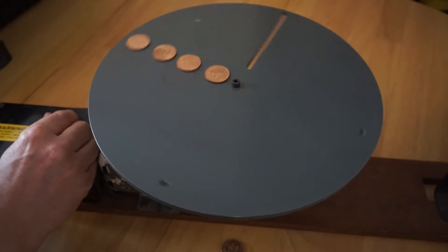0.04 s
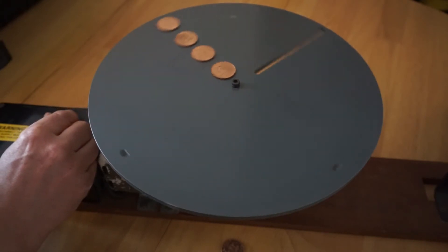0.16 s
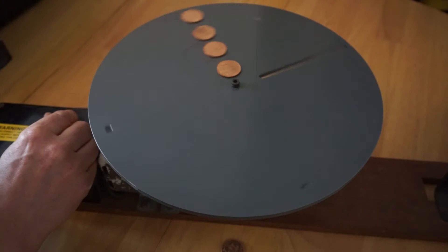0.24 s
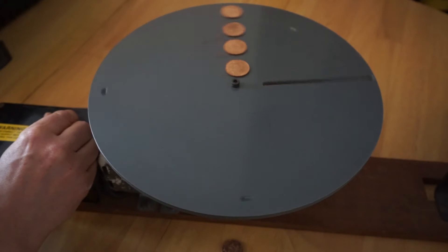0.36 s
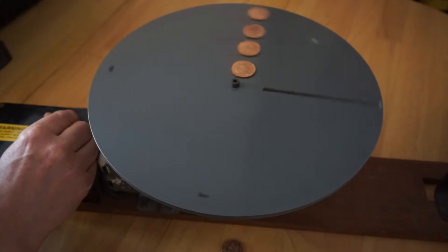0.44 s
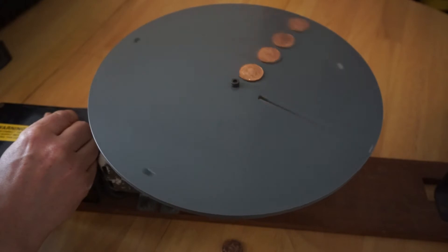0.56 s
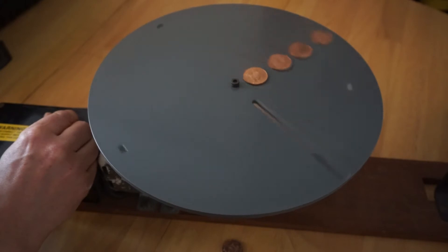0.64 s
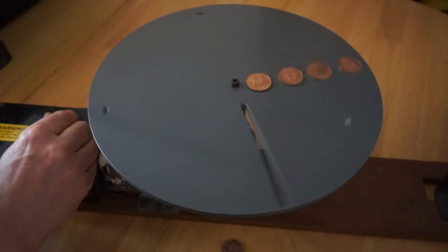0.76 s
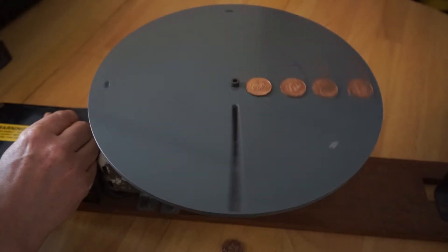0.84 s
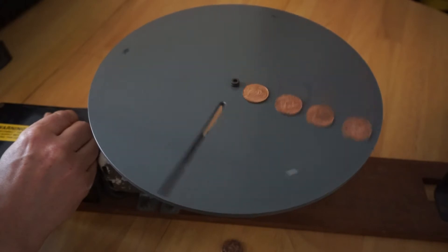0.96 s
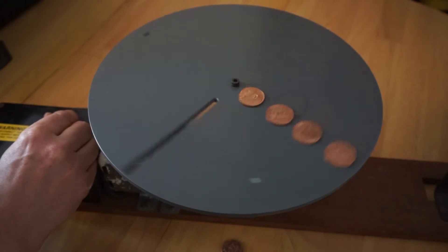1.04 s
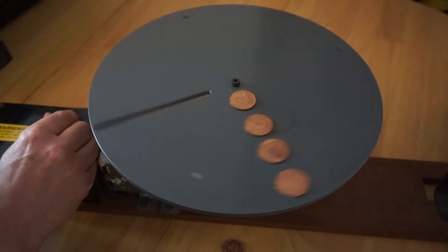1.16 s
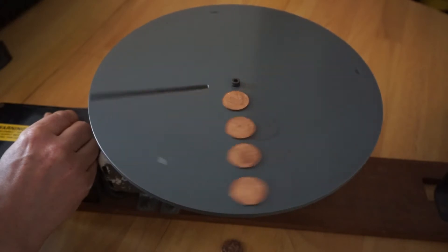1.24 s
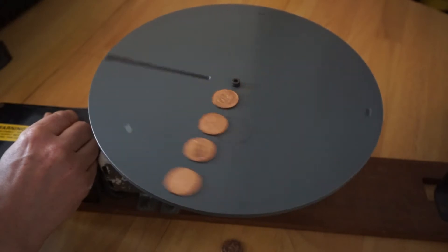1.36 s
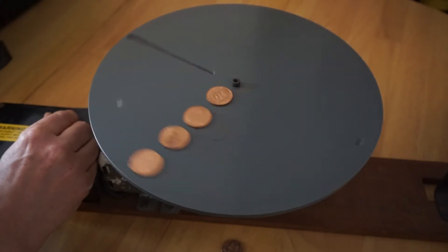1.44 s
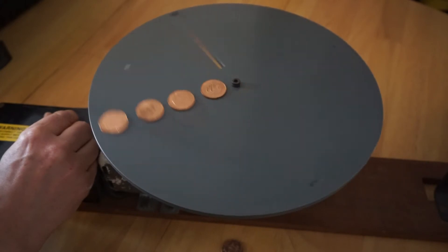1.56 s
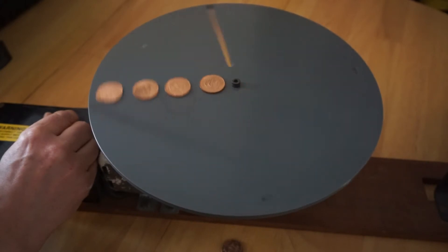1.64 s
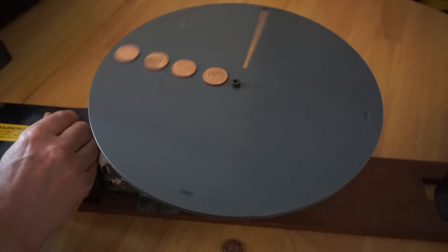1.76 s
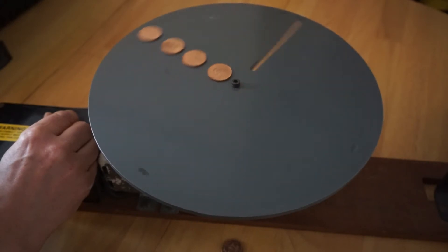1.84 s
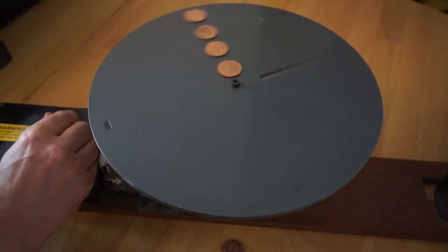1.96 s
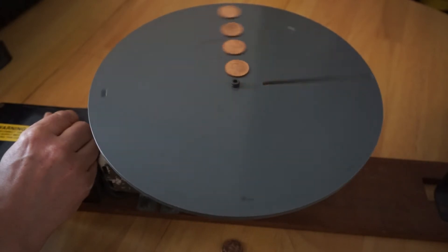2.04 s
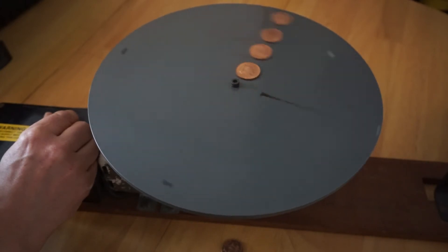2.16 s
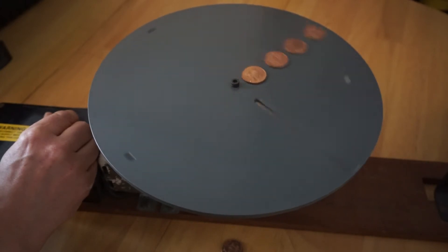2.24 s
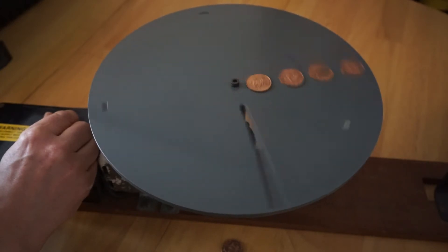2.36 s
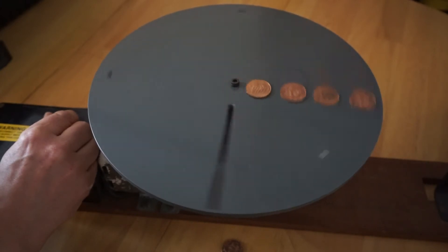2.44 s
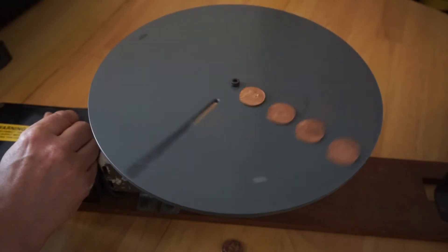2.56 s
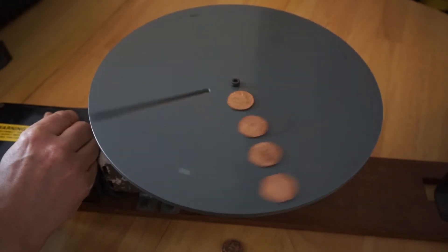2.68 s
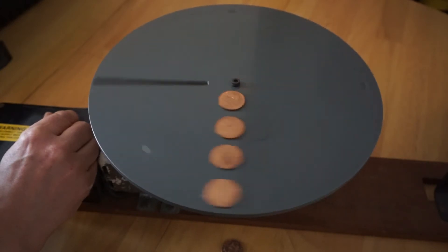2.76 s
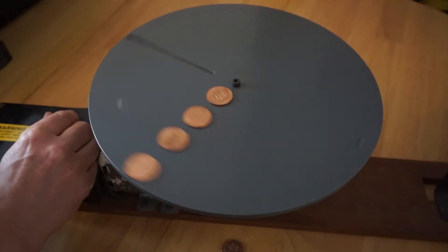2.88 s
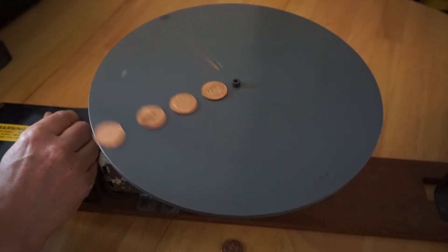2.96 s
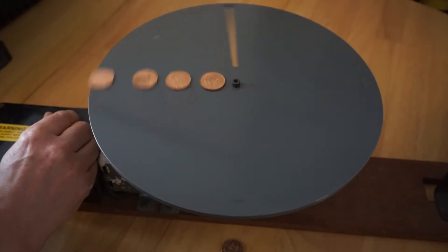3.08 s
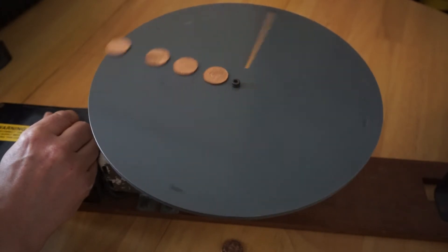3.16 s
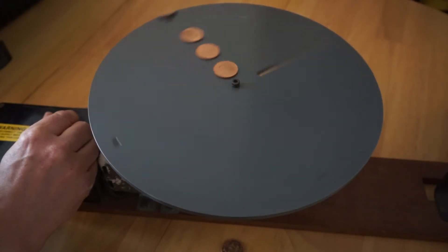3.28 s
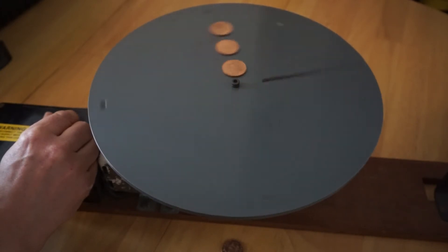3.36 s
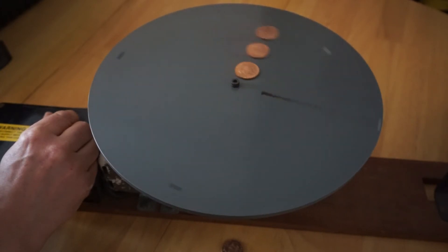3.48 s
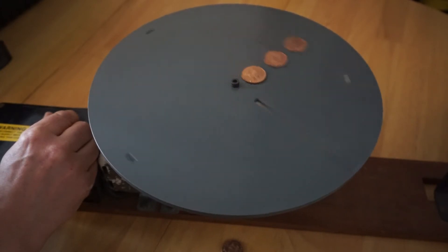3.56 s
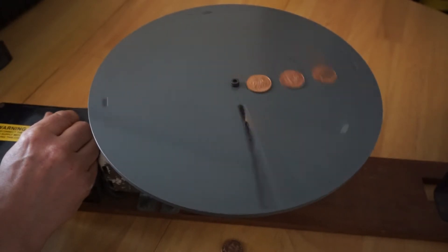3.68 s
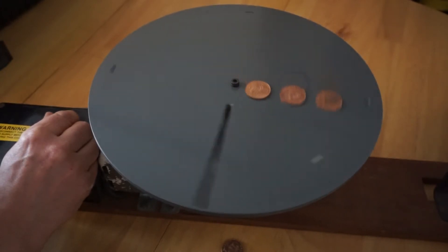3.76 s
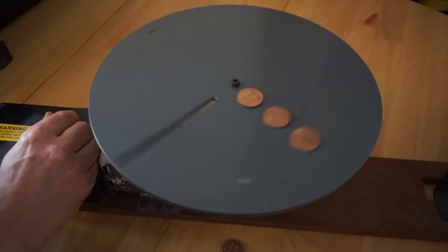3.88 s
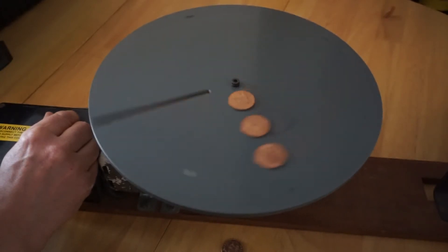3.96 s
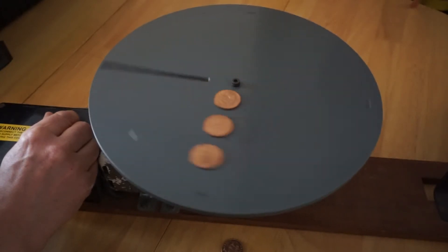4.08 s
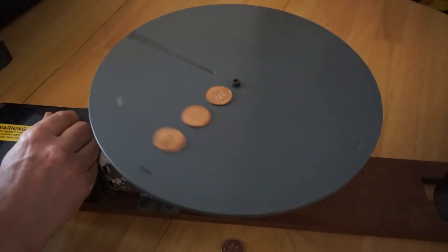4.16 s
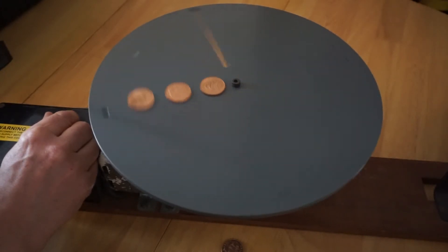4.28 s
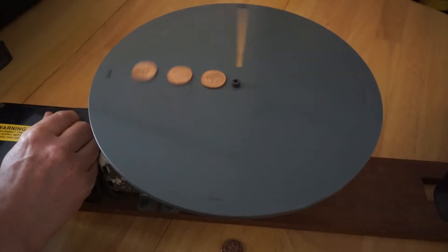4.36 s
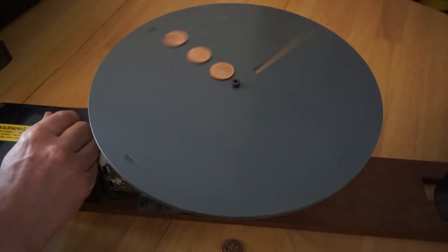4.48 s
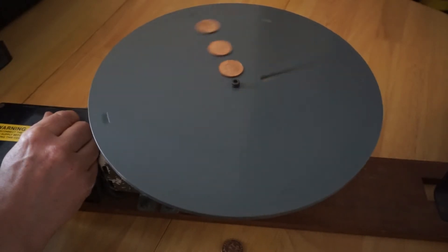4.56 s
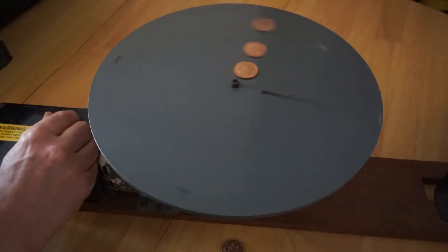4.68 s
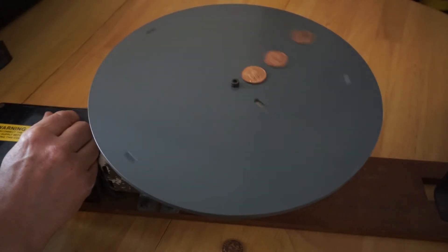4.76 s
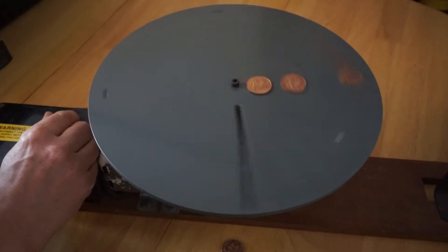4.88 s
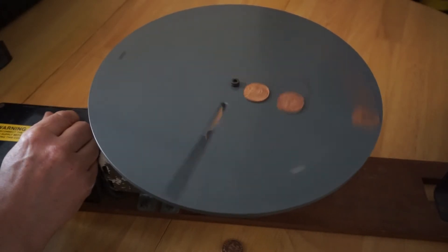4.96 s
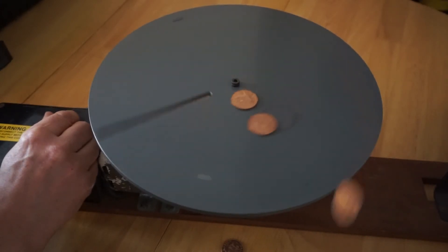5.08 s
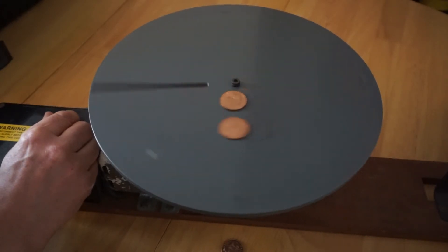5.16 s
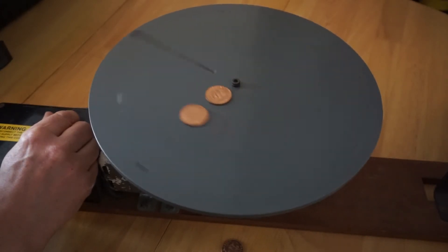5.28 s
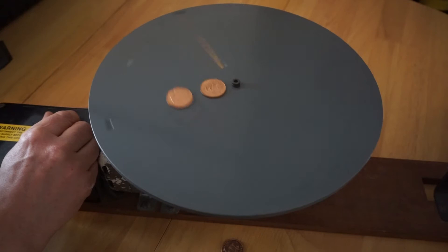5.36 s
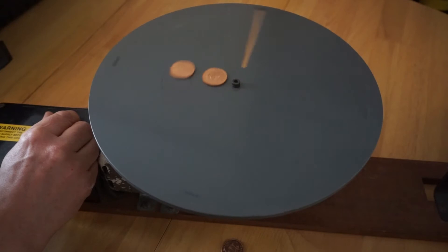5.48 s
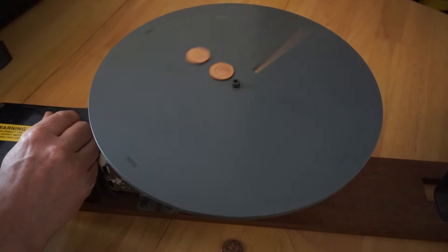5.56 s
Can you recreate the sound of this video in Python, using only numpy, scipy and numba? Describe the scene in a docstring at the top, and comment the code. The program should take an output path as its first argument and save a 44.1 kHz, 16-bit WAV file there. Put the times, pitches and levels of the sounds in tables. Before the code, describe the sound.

Close by in a small room, a motor spins a disc with a steady low hum and a rattling buzz. After a few seconds a coin slips off, clattering and ringing on a wooden tabletop before it rolls over the edge and thuds on the floor. A second coin follows with a faint scrape, bright knocks on the wood and a quick metallic clink, while the motor keeps running.

```python
"""A mains motor hums and buzzes under a spinning disc on a wooden table: its magnetic pull shakes the
frame and rattles the casing, while the disc whispers up to speed. Two coins scrape off in turn and bounce
on the wood, ringing as they tumble. The first rolls over the edge and thuds on the floor; the second
clinks against metal. Soft room air lies underneath, and a limiter ducks the mix after the hard blows."""
import sys
import numpy as np
from scipy import signal
from scipy.fft import rfft, irfft
from scipy.io import wavfile
from scipy.ndimage import uniform_filter1d
from numba import njit

SR = 44100
rng = np.random.default_rng(int(sys.argv[2]) if len(sys.argv) > 2 else 0)


def wav_record(signal):
    """Record a signal, one row per channel, as 16-bit PCM in the file named by sys.argv[1]."""
    frames = np.transpose(np.atleast_2d(signal))
    bounded = np.clip(frames, -1, 1)
    # unit amplitude maps onto the largest positive 16-bit level
    quanta = np.round(bounded * 32767).astype(np.int16)
    wavfile.write(sys.argv[1], SR, quanta)


N = 247842
T = np.arange(N) / SR
HZ = np.maximum(np.fft.rfftfreq(N, 1 / SR), 1)
AGE = T[:SR * 3 // 4]  # seconds since a hit

# The hum's harmonics. Each row: multiple of the magnetic pull, relative level in dB.
HUM_HARMONICS = [(1, -18.5), (2, -9), (3, 4), (4, 4.5), (5, -11.5), (6, -1.5), (7, -58), (8, -68),
                 (9, -18.5), (10, -26), (12, -23)]
# Resonances of the motor's casing and chassis. Each row: centre in Hz, width in Hz, gain in dB.
CASING_MODES = [(1200, 45, -17.5), (1610, 200, -19), (1795, 56, -14.5), (2043, 71, 1), (2242, 90, 6),
                (2460, 122, -1.5), (2590, 37, -16), (2820, 37, -19), (3098, 23, -6), (3544, 160, -10.5),
                (3870, 130, -27), (4855, 94, -15.5), (5810, 650, -16)]
CHASSIS_MODES = [(128.3, 7.3, -2.5), (578, 123, -4), (704, 53, 5), (806, 24, -7)]
# Coins knocking on the table. Each row: start in seconds, level in dB, treble roll-off in Hz.
COIN_KNOCKS = [(3.47, -3.5, 3620), (3.482, -5, 5600), (3.622, -7.5, 3720), (3.639, -8, 4640),
               (3.692, -9.5, 4430), (3.740, -8, 3180), (3.798, -19.5, 3270), (3.848, -25, 2600),
               (5.257, -5, 4240), (5.267, -9.5, 4440), (5.287, -11, 4300), (5.389, -17.5, 6500)]
# The table top's resonances. Each row: centre in Hz, width in Hz, gain in dB.
TABLE_MODES = [(456, 39, -5), (581.5, 39, -3.5), (764, 13, -10), (1092, 12.6, -4.5), (1300, 54, -5),
               (1462, 14, -8.5), (1690, 16, -8), (2356, 67, 0.5), (2850, 23, -28), (4210, 50, -5)]
# The tone of a knock on wood. Each row: frequency in Hz, gain in dB.
WOOD_EQ = [(60, -62), (200, -9), (400, -7), (600, -3.5), (900, -5.5), (1500, -4.5), (2800, -3),
           (4500, -7.5), (7000, -6.5), (15000, 5)]
# Coins tumbling. Each row: start and end in seconds, level in dB, attack in seconds, tumble rate in Hz.
COIN_TUMBLES = [(3.47, 3.82, -17, 0.0027, 7.72), (4.59, 4.68, -54, .003, 11),
                (5.254, 5.547, -9.5, 0.021, 18)]
# Each coin's bending modes, with close pairs that beat. Each row: pitch in Hz, level in dB.
FIRST_COIN_MODES = [(7041, -13.5), (7072, -6.5), (8479, -16), (12090, -27), (12352, -8.5), (12396, 2)]
SECOND_COIN_MODES = [(7002, -22), (7058, -18), (8465, -23), (12307, -11), (12345, -6), (12408, -9)]
# The second coin hitting metal. Each row: start in seconds, level in dB.
METAL_HITS = [(5.391, -11.5), (5.414, -9.5), (5.421, -2.5)]
# The metal's ring. Each row: pitch in Hz, level in dB, seconds to decay by 60 dB.
METAL_MODES = [(3813, -3, .2), (4890, -7, .17), (9075, -13, .16), (10830, -14, .16), (11618, -10, .17),
               (13660, -13, .12), (14490, -20, .12)]
# The second coin's dry ticks. Each row: start in seconds, level in dB, centre in Hz, width in Hz.
DRY_TICKS = [(5.390, -8, 3480, 2600), (5.392, -12, 1630, 500), (5.555, -20.5, 7000, 1200)]
# Dull hits on table edge and floor. Each row: start in seconds, level in dB, low and high cut in Hz.
DULL_HITS = [(4.133, -22, 617, 2600), (4.5378, -11, 135, 1440), (4.5445, -13, 125, 685),
             (4.5943, -12, 495, 2620), (4.601, -15.5, 256, 526), (4.761, -30, 93, 265.6),
             (4.908, -35, 88, 242)]
# The floorboards' boom. Each row: pitch in Hz, level in dB, seconds to decay by 60 dB.
FLOOR_MODES = [(143, -4, .22), (177, -5, .18), (232, -13, .17), (362, -6, .2), (720, -14, .12)]
# Coins sliding off the disc. Each row: arrival at the rim in seconds, level there in dB.
COIN_SLIDES = [(3.28, -43), (5.09, -37.5)]
# The room tone's colour. Each row: frequency in Hz, gain in dB.
AIR_EQ = [(15, -15), (26, -10.5), (38, -5.5), (70, -19.5), (250, -11), (500, -11.5), (1150, -19.5),
          (3000, -13), (8000, -32), (15000, -39.5)]

ROOM_T60_S, WIDE_HZ = 0.39, 2600  # the stereo image opens up around WIDE_HZ


def motor(pull_hz=99.82, hum_db=-32.5, casing_db=-37):
    """The magnetic pull hums in the frame and taps the casing once a cycle; both swell with each turn."""
    cycles = pull_hz * T + 0.003 * wander(5)
    left_lead = np.array([[1], [0]])  # the motor sits left, so that side is a touch early
    hum = unit_rms(sum(undb(db) * np.cos(2 * np.pi * round(k) * (cycles + 0.0098 * left_lead))
                       for k, db in HUM_HARMONICS))
    # nearly even taps ring the casing, and a rasp swells with each
    chatter = cycles + .35 + 0.0011 * wander(60)
    tap_size = undb(.4 * wander(100))
    taps = np.diff(np.floor(chatter + 0.0051 * left_lead), prepend=0) * tap_size
    shell = resonances(CASING_MODES)
    buzz = unit_rms(irfft(rfft(taps) * shell, N)) * undb([[.8], [-.8]])
    rasp = unit_rms(noise(shell) * np.exp(0.14 * np.cos(2 * np.pi * chatter)))
    casing = (undb(-3) * buzz + undb(-6) * rasp) * undb(0.6 * wander(10))
    swell = turn_swell()
    hum_gain = undb(hum_db + .5 * swell + 0.23 * wander(3.73))
    casing_gain = undb(casing_db + .7 * swell) * speed_gain(db_per_doubling=1.5)
    return hum * hum_gain + casing * casing_gain


def disc(whisper_db=-59, bearing_db=-41):
    """As the disc speeds up it whispers in the air and its bearing rustles in the chassis."""
    whisper = noise(resonances([(7150, 14000, 0)])) * undb(whisper_db - 3 * wander(11))
    flutter = undb(1.1 * wander(12))
    bearing = noise(resonances(CHASSIS_MODES)) * undb(bearing_db) * flutter
    return whisper * speed_gain(db_per_doubling=21) + bearing * speed_gain(db_per_doubling=9)


def disc_speed(start_share=.61, spin_up_s=3.5):
    """The disc's share of full speed climbs evenly, then holds."""
    return np.interp(T, [0, spin_up_s], [start_share, 1])


def speed_gain(db_per_doubling):
    """A fader that rises with the disc's speed."""
    return undb(db_per_doubling * np.log2(disc_speed()))


def turn_swell(full_turns_per_s=.8, crest_s=2.82):
    """A slow swing between -1 and 1, once per turn of the disc."""
    turns = np.cumsum(disc_speed()) * full_turns_per_s / SR
    return np.cos(2 * np.pi * (turns - np.interp(crest_s, T, turns)))


def coin_bounces(slap_s=.008):
    """Each landing knocks the wood, a little to the right: dull when flat, bright on the rim."""
    out = np.zeros((2, N))
    for s, db, bright_hz in COIN_KNOCKS:
        wood = eq_curve(WOOD_EQ) * (1 + 0.34 * resonances(TABLE_MODES))
        wood /= np.hypot(1, (HZ / bright_hz) ** 4.4)
        # narrow resonances ring longer
        table_ring = ring([(hz, mode_db - 8, 4.75 / width) for hz, width, mode_db in TABLE_MODES])
        force = undb(db + np.array([[-1], [1]]))
        place(out, s, force * (crack(wood, t60_s=0.053, room_db=-7.5) + table_ring))
        # the opposite rim slaps down a moment later
        place(out, s + slap_s, force * undb(-9) * crack(wood, t60_s=0.05, room_db=-11.5))
    return out


def coin_ringing(free_t60_s=3.1, settle_t60_s=0.094):
    """A coin rings while it tumbles and is choked once its rim stays on the wood."""
    out = np.zeros((2, N))
    last_thud_s = DULL_HITS[-1][0]
    for s, end_s, db, attack_s, tumble_hz in COIN_TUMBLES:
        coin = FIRST_COIN_MODES if s < last_thud_s else SECOND_COIN_MODES
        # its two faces flash left and right in turn
        facing = 1 + 0.38 * np.cos(4 * np.pi * tumble_hz * AGE + np.pi * np.array([[0], [.5]]))
        choke = undb(-60 * np.maximum(s + AGE - end_s, 0) / settle_t60_s)
        tone = ring([(hz, mode_db, free_t60_s) for hz, mode_db in coin], rise_s=attack_s)
        place(out, s, undb(db) * facing * choke * tone)
    uneven_tumble = undb(5.5 * np.array([wander(55), wander(55)]))
    return room_reverb(out * uneven_tumble, wet_db=-8)


def metal_clinks():
    """Coin on metal: a hiss of contact and a short, high ring, with hard, dry ticks."""
    out = np.zeros((2, N))
    for s, db in METAL_HITS:
        hiss = crack(resonances([(10400, 60000, 0)]), t60_s=0.031, room_db=-15.5)
        place(out, s, undb(db - 3) * (ring(METAL_MODES) + hiss))
    for s, db, hz, width in DRY_TICKS:
        place(out, s, undb(db) * crack(resonances([(hz, width, 0)]), t60_s=0.062, room_db=-13.5))
    return out


def coin_thuds():
    """Soft contacts: one rounded push, its scatter, and the floor's boom under the deep ones."""
    out = np.zeros((2, N))
    for s, db, low_hz, high_hz in DULL_HITS:
        bandpass = signal.butter(4, [low_hz, high_hz], "bandpass", fs=SR, output="sos")
        push = signal.sosfilt(bandpass, 1. * (AGE == 0))
        push /= np.abs(push).max()
        band = 1 / np.hypot(1, (low_hz / HZ) ** 3) / np.hypot(1, (HZ / high_hz) ** 4.8)
        scatter = crack(band, t60_s=0.066, room_db=-7, rise_s=.5 / high_hz)
        boards = [(hz, mode_db + 20 * np.log10(np.interp(hz, HZ, band)), t60)
                  for hz, mode_db, t60 in FLOOR_MODES]
        boom = ring(boards, rise_s=0.0017)
        place(out, s, undb(db) * (undb(3) * push + undb(-4) * scatter + undb(-5) * boom))
    return out


def coin_roll(start_s=3.82, end_s=4.16, fade_s=.04, level_db=-32, rise_db_per_s=4.5, top_hz=2300):
    """The first coin's rim patters over the grain and stirs the table's modes, growing a little."""
    body = eq_curve(WOOD_EQ) * (.5 + resonances(TABLE_MODES)) / np.hypot(1, (HZ / top_hz) ** 4)
    patter = noise(body) * undb(1.95 * wander(140))
    gate = np.interp(T, [start_s - fade_s, start_s, end_s, end_s + fade_s], [0, 1, 1, 0])
    return patter * gate * undb(level_db + rise_db_per_s * (T - start_s))


def coin_slides(swell_db_per_s=82, fade_db_per_s=193):
    """A faint, singing scrape swells as each coin gathers speed across the disc."""
    scrape = resonances([(2600, 2300, 29.5), (8000, 8000, -38), (12370, 120, 24.5)])
    swell = sum(undb(db - np.maximum(swell_db_per_s * (s - T), fade_db_per_s * (T - s)))
                for s, db in COIN_SLIDES)
    return noise(scrape) * undb(2.6 * wander(120)) * swell


def room_reverb(x, wet_db):
    """The sound plus its diffuse tail in a small room."""
    tail = rng.standard_normal((2, len(AGE))) * decay(ROOM_T60_S) * (AGE > .003)
    tail /= np.sqrt(np.sum(tail ** 2, axis=1, keepdims=True))
    return x + undb(wet_db) * signal.fftconvolve(x, tail, axes=1)[:, :N]


def room_air(level_db=-44):
    """A steady, soft bed of room tone."""
    return undb(level_db) * noise(eq_curve(AIR_EQ))


def crack(tone, t60_s, room_db, rise_s=0.00025):
    """A short burst of contact noise and the room's answer."""
    burst = noise(tone, size=len(AGE)) * decay(t60_s)
    tail = noise(tone, size=len(AGE)) * decay(ROOM_T60_S)
    return (burst + undb(room_db) * tail) * onset(rise_s)


def ring(modes, rise_s=0.0023):
    """Decaying sines from (Hz, dB, t60 in seconds) rows; the higher ones spread wider."""
    out = 0
    for hz, db, t60 in modes:
        phase = rng.uniform(0, 2 * np.pi)
        spread = np.array([[1], [-1]]) * rng.choice([-1, 1]) * np.arctan(hz / np.hypot(hz, WIDE_HZ))
        out = out + undb(db) * decay(t60) * np.sin(2 * np.pi * hz * AGE + phase + spread)
    return out * onset(rise_s)


def noise(tone, size=N):
    """Coloured stereo noise, centred in the bass and wide in the treble."""
    hz = np.fft.rfftfreq(size, 1 / SR)
    mid, side = rfft(rng.standard_normal((2, size)))
    side = side * hz / np.hypot(hz, WIDE_HZ) * np.array([[1], [-1]])
    return unit_rms(irfft((mid + side) * np.interp(hz, HZ, tone), size))


def resonances(modes):
    """An EQ curve of steep peaks from (centre Hz, width Hz, dB) rows."""
    return sum(undb(db) / (1 + (hz / width * (HZ / hz - hz / HZ)) ** 2) for hz, width, db in modes)


def eq_curve(points):
    """An EQ curve drawn through (Hz, dB) points."""
    hz, db = np.transpose(points)
    return undb(np.interp(np.log(HZ), np.log(hz), db))


def wander(rate_hz):
    """Smooth random modulation with a spread near 1."""
    hold = int(SR / rate_hz)
    steps = np.repeat(rng.standard_normal(N // hold + 1), hold)
    return 1.3 * uniform_filter1d(uniform_filter1d(steps, hold), hold)[:N]


def onset(rise_s):
    """A rounded attack: the softer the contact, the slower."""
    return 1 - np.exp(-(AGE / rise_s) ** 2)


def decay(t60_s):
    return undb(-60 * AGE / t60_s)


def place(out, start_s, sound):
    start = int(start_s * SR)
    out[:, start:start + len(AGE)] += sound[:, :N - start]


def undb(db):
    return 10 ** (np.asarray(db) / 20)


def unit_rms(x):
    return x / np.sqrt(np.mean(x ** 2))


@njit
def gain_reduction(excess, attack, release):
    """The limiter's envelope grabs fast and lets go slowly."""
    out, held = np.empty(len(excess)), 0.
    for i in range(len(excess)):
        held += (excess[i] - held) * (attack if excess[i] > held else release)
        out[i] = held
    return out


def scene():
    """Motor, disc and coins over the room tone."""
    air = room_air()
    machine = motor() + disc()
    coins = coin_bounces() + coin_ringing() + metal_clinks() + coin_thuds() + coin_roll() + coin_slides()
    return machine + coins + air


def record(dry, ceiling_db=-6.5, attack_s=0.000074, release_s=0.48, top_hz=15700):
    """A limiter looks a millisecond ahead and ducks the mix on peaks; a steep low-pass trims the top."""
    ahead = SR // 1000
    peak_db = 20 * np.log10(np.abs(dry).max(axis=0) + 1e-9)
    excess_db = np.maximum(peak_db - ceiling_db, 0)
    duck_db = gain_reduction(np.pad(excess_db, (0, ahead)), 1 / (attack_s * SR), 1 / (release_s * SR))
    limited = dry * undb(-uniform_filter1d(duck_db, ahead)[ahead:])
    return signal.sosfilt(signal.ellip(10, .2, 80, top_hz, fs=SR, output="sos"), limited)


dry = scene()
out = record(dry)
wav_record(out)
```